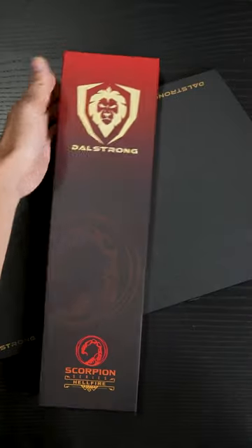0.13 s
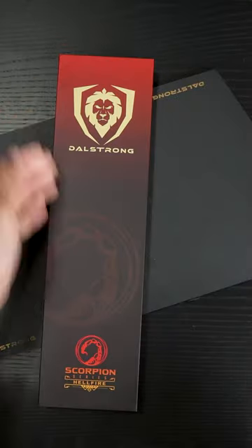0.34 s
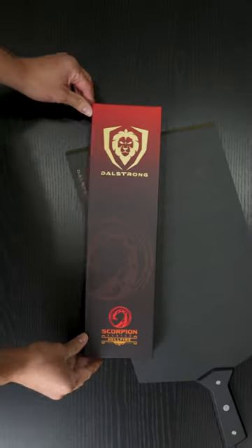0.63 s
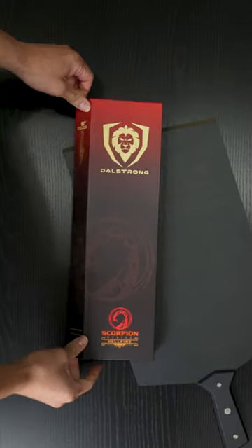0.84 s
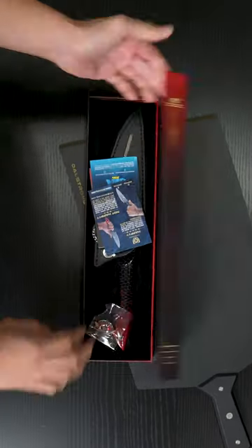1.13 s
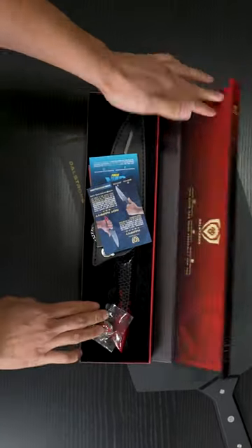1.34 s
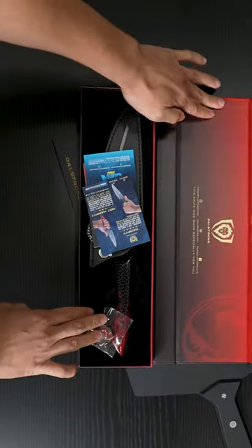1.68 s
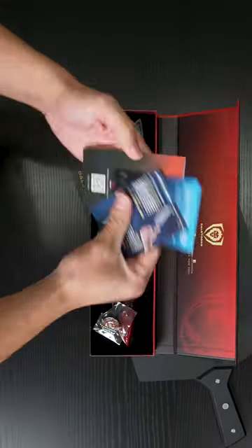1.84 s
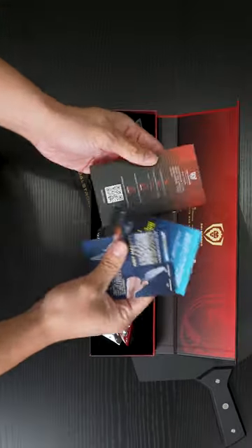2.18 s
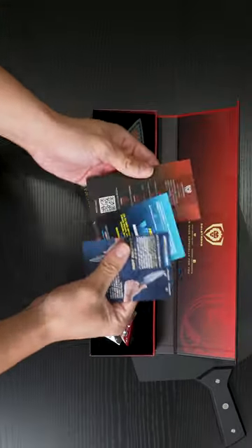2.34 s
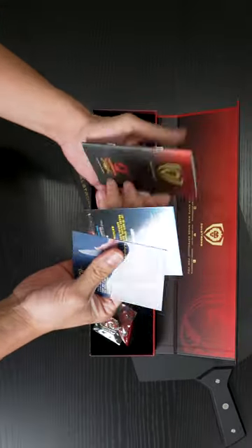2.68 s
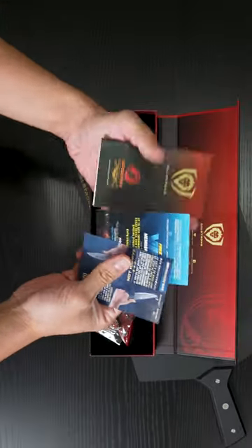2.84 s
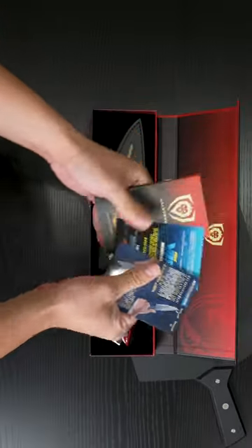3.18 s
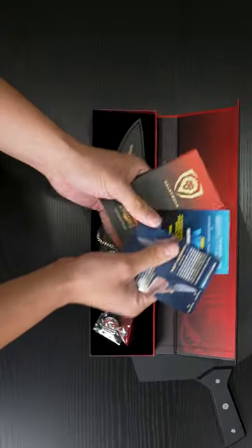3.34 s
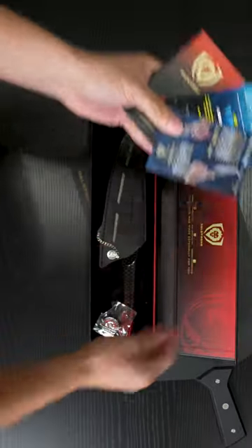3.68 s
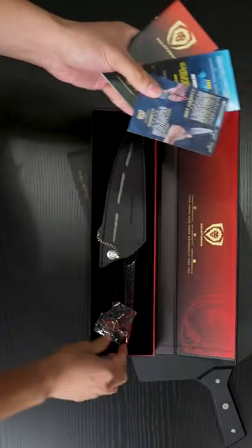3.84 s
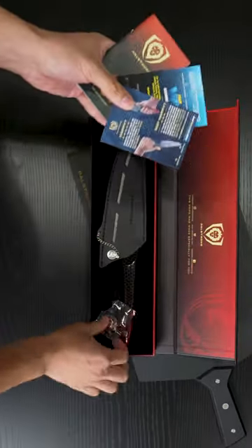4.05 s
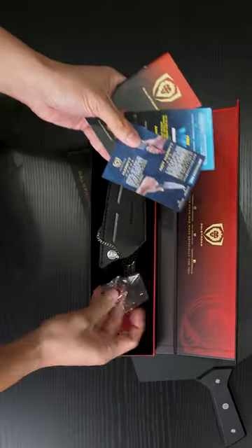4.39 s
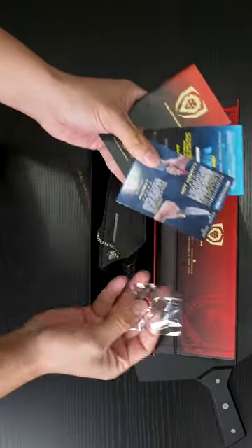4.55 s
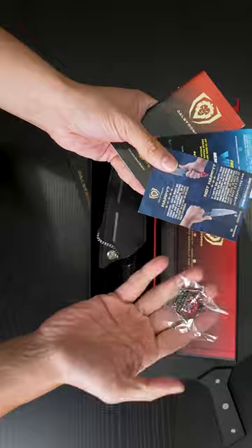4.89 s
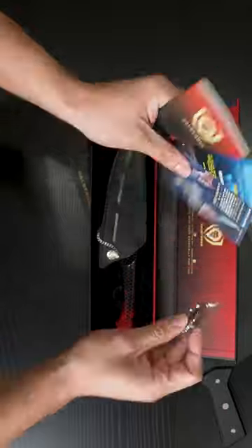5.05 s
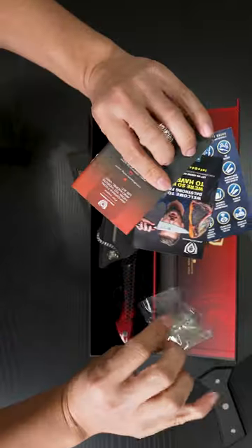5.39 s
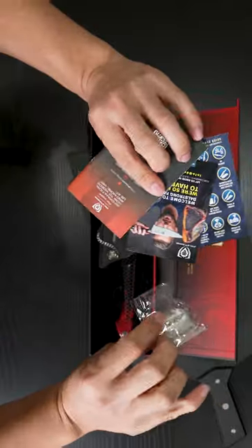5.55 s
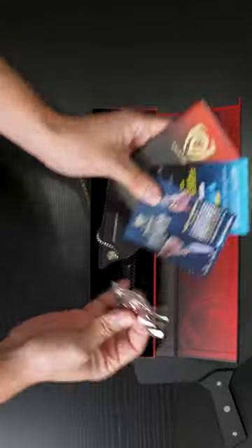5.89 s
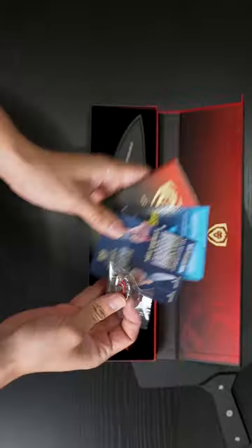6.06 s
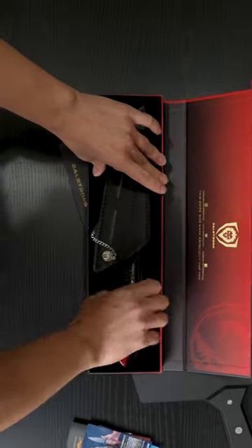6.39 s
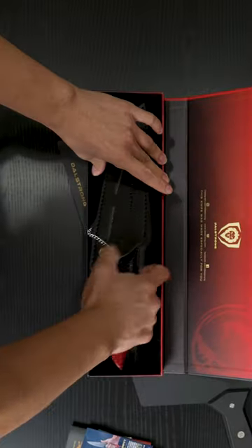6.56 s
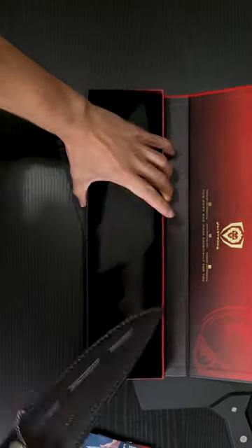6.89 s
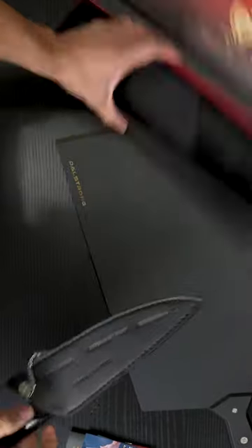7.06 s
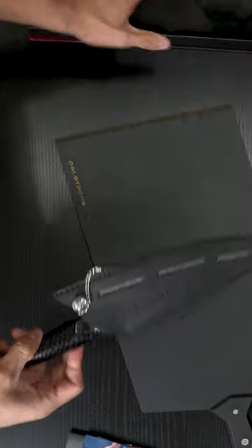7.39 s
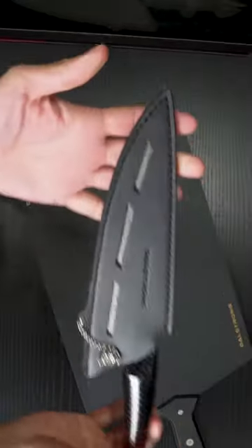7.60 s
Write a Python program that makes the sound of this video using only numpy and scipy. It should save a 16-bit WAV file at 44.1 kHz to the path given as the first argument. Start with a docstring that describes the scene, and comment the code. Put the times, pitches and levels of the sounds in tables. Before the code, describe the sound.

Loud hollow box bumps with low thuds, a crisp opening snap, sliding cards, crackling plastic bag, and a final hard click in a small room.

```python
"""A stiff cardboard gift box is knocked and set down on a desk under a phone in a small room, its stand swaying
after each bump; then it is opened. Cards slide in the hands, a small plastic bag crinkles and a sheath clicks.
Blows ring a resonant box, box tails and friction are shaped noise and snaps are short coloured bursts.
Throughout, noise suppression leaves near silence with flickering low tones between the sounds."""
import sys
import numpy as np
from scipy import signal
from scipy.fft import rfft, irfft, next_fast_len
from scipy.io import wavfile
from scipy.ndimage import uniform_filter1d

SR = 44100
rng = np.random.default_rng(int(sys.argv[2]) if len(sys.argv) > 2 else 0)


def generate_wav(signal):
    """Clip the signal to [-1, 1] and save it as 16-bit WAV at the path in sys.argv[1]."""
    frames = np.transpose(np.atleast_2d(signal))
    scaled = np.clip(frames, -1, 1) * 32767
    pcm = np.round(scaled).astype(np.int16)
    wavfile.write(sys.argv[1], SR, pcm)


N = 340893

# moments at which noisy swells, sway and room tails stop short and the suppressor's memory restarts: time [s]
CUTS_S = [.585, 1.92, 6.26, 6.965, 7.593]


def amp(db):
    """Amplitude of a level in dB."""
    return 10 ** (np.asarray(db) / 20)


def unit(x):
    """x scaled to an rms of 1."""
    return x / np.sqrt(np.mean(x ** 2) + 1e-20)


def along(points, hz):
    """Values at hz between (frequency [Hz], value) points on a log frequency axis."""
    f, v = np.transpose(points)
    return np.interp(np.log(hz + 1), np.log(f + 1), v)


def filtered(x, response):
    """x times a complex response of frequency."""
    m = next_fast_len(N + SR // 2)
    return irfft(rfft(x, m) * response(np.fft.rfftfreq(m, 1 / SR)), m)[..., :N]


def place(times, sounds):
    """Each column of sounds starts at its time."""
    out = np.zeros(N + SR)
    for s, sound in zip(times, sounds.T):
        out[round(s * SR):][:len(sound)] += sound
    return out[:N]


def patchy(size, depth_db, wide, long):
    """Noise whose level varies at random in patches of frequency and time."""
    z = signal.stft(rng.standard_normal(N + SR), nperseg=size)[2]
    field = uniform_filter1d(rng.standard_normal(z.shape), size=wide, axis=0)
    field = uniform_filter1d(field, size=long, axis=1)
    return signal.istft(z * amp(depth_db * unit(field)), nperseg=size)[1][:N]


def swells(t, s, db, rise, fall, bend):
    """Power of each swell (rows) over t: steady dB rise to its peak, fall that may bend, silence past a cut."""
    span_db = 40  # covered in one rise or fall time
    late = t - s[:, None]
    rising = -late / np.abs(rise)[:, None]
    falling = np.abs(late / fall[:, None]) ** bend
    slope = np.where(late < 0, rising, falling)
    same_moment = np.digitize(s, CUTS_S)[:, None] == np.digitize(t, CUTS_S)
    return amp(db[:, None] - span_db * slope) ** 2 * same_moment


def peaked(hz, peak_hz, below_db, above_db):
    """Gains over hz (first axis) falling from a peak; thin sheets radiate no bass; mean power 1."""
    round_octaves = 0.072  # roundness of the peak
    octaves = np.log2((hz[:, None] + 1) / peak_hz)
    below = below_db * np.logaddexp(0, -octaves / round_octaves)
    above = above_db * np.logaddexp(0, octaves / round_octaves)
    gain = amp(-round_octaves * (below + above))
    gain = gain / (1 + (450 / (hz[:, None] + 1)) ** 4)  # bass loss
    return gain / np.sqrt(np.mean(gain ** 2, axis=0))


def bursts(gains, t60):
    """One noise burst a column, a fast decay plus a slow one; the gain is its rms over 3 ms."""
    t = np.arange(1024)[:, None] / SR
    shape = amp(-60 * t / t60) + 1.4 * amp(-60 * t / (9.7 * t60))
    burst = shape * rng.standard_normal((len(gains), len(t))).T
    return gains * burst / np.linalg.norm(burst, axis=0) * np.sqrt(.003 * SR)


def rumble():
    """Faint room rumble: noise patchy in time and frequency, weighted to the lows."""
    # rumble spectrum: (frequency [Hz], relative level [dB])
    spectrum = [(20, -18), (100, -8.5), (230, -10), (450, -19.5), (800, -26.5), (1400, -27.5),
                (2600, -34.5), (3500, -88.5)]
    noise = patchy(size=2048, depth_db=10.5, wide=4, long=3)
    return amp(-66.5) * unit(filtered(noise, lambda hz: amp(along(spectrum, hz))))


def stand():
    """The stand carries each bump to the microphone as a slow sway, its pace the power-weighted mean."""
    # bumps that reach the stand: (time of peak [s], level [dB], frequency [Hz], rise [s], fall [s])
    bumps = [(.09, -20, 39, 0.19, .3), (.225, -10, 35.3, 0.09, 0.23), (.41, -24.5, 34, 0.92, 0.11),
             (0.528, -38, 34.7, 0.043, 0.31), (.61, -39.5, 35.5, 0.25, .12), (0.851, -25, 36.2, .13, 0.14),
             (7.3, -36, 64.4, 0.11, 0.07)]
    s, db, hz, rise, fall = np.transpose(bumps)
    power = swells(np.arange(N) / SR, s, db, rise, fall, bend=1) + 1e-30
    pace_hz = hz @ power / power.sum(axis=0)
    return np.sqrt(2 * power.sum(axis=0)) * np.sin(2 * np.pi * np.cumsum(pace_hz) / SR)


def rustle():
    """Noisy box tails and friction; uneven creases pop in the crinkling, more often when the grip is harder."""
    # noisy swells: box tails after knocks, sliding cards, dull flicks and scuffs of box or card near 2 kHz,
    # broad bright rubs, mostly of film: (time of peak [s], relative level [dB], strongest [Hz], rise [s], fall [s])
    box_tails = [(.035, -15.5, 463, 0.023, 0.044), (.11, -16.5, 510, 0.027, 0.021),
                 (.18, -11.5, 574, 0.066, 0.25), (.24, -21.5, 1300, 0.33, 0.33),
                 (.77, -39.5, 603, 0.027, 0.11), (.998, -54.5, 500, 0.026, 0.13),
                 (1.285, -50.5, 1110, 0.044, .12), (1.626, -38.5, 980, 0.018, 0.082),
                 (1.715, -38, 1250, 0.17, 0.14), (4.25, -43.5, 600, 0.02, 0.07),
                 (4.555, -50, 600, 0.017, 0.084), (6.24, -43.5, 800, 0.049, 0.13),
                 (7.265, -26.5, 750, 0.019, 0.077)]
    card_slides = [(1.6, -47.5, 11400, 0.17, 0.3), (1.93, -57.5, 11620, 0.066, .4),
                   (2.03, -44.5, 8800, 0.35, .24), (2.18, -57, 9000, 0.23, 0.17),
                   (2.41, -52.5, 12210, 0.15, 0.33), (2.99, -50, 10440, 0.031, .3),
                   (3.08, -37, 11840, 0.14, 0.15), (3.203, -28.5, 4940, 0.13, 0.16),
                   (6.58, -68, 8900, 0.13, 0.12)]
    dull_flicks = [(.59, -57, 1600, 0.012, 0.27), (.772, -41.5, 2000, .025, 0.092),
                   (.995, -49, 2240, 0.026, .12), (2.06, -49, 2100, 0.17, 0.18),
                   (2.25, -64.5, 2302, 0.12, .15), (2.664, -40.5, 2048, .04, 0.11),
                   (3.03, -56, 2350, 0.11, 0.12), (3.12, -52.5, 1990, 0.061, 0.13),
                   (5.39, -56, 1500, 0.054, .2), (5.43, -48, 1520, 0.14, 0.14),
                   (5.54, -55.5, 1450, 0.053, 0.14), (5.66, -51.5, 1740, 0.11, .15),
                   (5.86, -64, 1360, .08, 0.16), (6.985, -36, 1820, 0.038, 0.11),
                   (7.268, -25.5, 1900, 0.023, 0.13), (7.36, -43, 1967, .2, 0.14)]
    bright_rubs = [(.795, -57, 5000, 0.047, 0.098), (1.367, -42, 4820, 0.11, 0.21),
                   (1.442, -42.5, 4730, 0.22, 0.3), (1.33, -45.5, 1600, .06, 0.24),
                   (1.69, -45.5, 5500, .25, 0.12), (2.05, -43.5, 4050, 0.094, 0.17),
                   (2.88, -67, 3490, .05, 0.09), (3.43, -63, 6690, 0.3, .07),
                   (4.011, -49.5, 1906, 0.026, 0.6), (4.106, -40, 3400, 0.16, 0.79),
                   (4.19, -40, 3500, 0.22, 0.195), (4.24, -29.5, 2270, 0.15, 0.22),
                   (4.41, -34, 7000, .15, 0.35), (4.54, -37.5, 2070, .16, 0.36),
                   (4.714, -39, 4547, .5, 0.33), (5.103, -41.5, 4850, 0.014, 0.2),
                   (5.208, -46.5, 5200, 0.093, 0.27), (5.542, -50.5, 9200, 0.075, 0.15),
                   (5.667, -53, 5220, 0.3, 0.35), (5.78, -49, 5030, .3, 0.47),
                   (5.922, -38.5, 1780, 0.039, 0.22), (6.026, -40, 3480, 0.27, 0.38),
                   (6.18, -39, 5500, 0.28, .4), (6.256, -33, 5170, .15, .3), (6.29, -56.5, 5000, .15, 0.26),
                   (6.38, -34.5, 3000, .08, .13), (6.44, -41.5, 3200, 0.065, 0.084),
                   (6.775, -43, 5670, 0.064, .13), (6.8, -59, 7150, .1, 0.22),
                   (6.884, -52, 7000, 0.037, 0.14), (7.135, -58, 3500, 0.0222, .06),
                   (7.415, -45, 5240, 0.028, 0.045)]
    # film and bag being creased: (start [s], end [s])
    crinkling_s = [(1.3, 1.75), (4.03, 4.8), (5.08, 6.45)]
    # colours: (swells, fall below peak [dB/octave], fall above a 4 kHz peak [dB/octave],
    # exponent steepening the latter with peak frequency, bend of the fall in time: above 1 slow first, then faster)
    colours = [(box_tails, 5.7, 16, 0.0088, 1.2), (card_slides, 17.3, 2.6, 2.7, 1.42),
               (dull_flicks, 35, 12.95, .01, 1.075), (bright_rubs, 9, 11, 0.82, 1.05)]
    coloured = [(*row, *colour) for rows, *colour in colours for row in rows]
    s, db, peak_hz, rise, fall, below_db, above_db, steepens, bend = np.transpose(coloured)
    above_db = above_db * (peak_hz / 4000) ** steepens
    frames = np.arange(0, N + 256, 128) / SR
    power = swells(frames, s, db, rise, fall, bend[:, None])

    t = np.arange(N) / SR
    grip_db = np.interp(t, frames, 10 * np.log10(power.sum(axis=0) + 1e-30))
    creasing = sum((t > a) & (t < b) for a, b in crinkling_s)
    pops_per_s = 260 * np.clip((grip_db + 57) / 20, 0, 1) * creasing
    pops = (rng.random(N) < pops_per_s / SR) * amp(1.8 * rng.exponential(size=N))
    crease = amp(-60 * np.arange(SR // 100) / SR / .006)  # t60 6 ms
    envelope = 1 + signal.fftconvolve(pops, crease)[:N]
    hiss = envelope * patchy(size=256, depth_db=4, wide=5, long=20)

    hz, _, z = signal.stft(hiss, SR, nperseg=256)
    gain = np.sqrt(peaked(hz, peak_hz, below_db, above_db) ** 2 @ power[:, :z.shape[1]])
    return amp(-4.0) * signal.istft(z * gain, SR, nperseg=256)[1][:N]


def knocks():
    """Each blow is one short push that rings the hollow box, and a crack on its surface."""
    # knocks on box and desk: (time [s], relative level [dB], crack relative to box tone [dB])
    blows = [(0.029, -21, -12), (.102, -7, -30), (.162, -5.5, -5.5), (.177, -10.5, -26), (.188, -5.5, -5.5),
             (.194, -24.5, 4), (.215, -14.5, -8.5), (.763, -37, -21.5), (0.796, -50.5, 6.5),
             (1.279, -53.5, -18), (1.621, -51.5, 1), (1.708, -63, -12), (4.248, -61, -14),
             (4.551, -66, -22.5), (6.238, -54, -6), (7.256, -36, -30), (7.269, -58, -8)]
    # hollow box resonances: (frequency [Hz], width [Hz], relative level [dB])
    resonances = [(110, 63, -9), (320, 120, -7.5), (490, 320, -1.5), (650.2, 250, 5), (806, 250, -3.5),
                  (1130, 200, -1.5), (2180, 690, -15.5)]
    s, db, crack_db = np.transpose(blows)

    def hollow(f):
        """Sum of the box resonances, alternating in sign."""
        return sum((-1) ** k * amp(g) * 1j * f * w / (c * c - f * f + 1j * f * w)
                   for k, (c, w, g) in enumerate(resonances))

    def surface(f):
        """Broad 3.5 kHz resonance, then three 6.2 kHz low-pass poles."""
        resonance = 1j * f * 4000 / (3500 ** 2 - f * f + 1j * f * 4000)
        return resonance / (1 + (1j * f / 6200)) ** 3

    push = signal.get_window("hann", Nx=14)[:, None] * amp(db + 21)
    rough = bursts(amp(db + 9.5), t60=0.0027)
    tone = filtered(place(s, push) + place(s, rough), hollow)
    crack = place(s, bursts(amp(db + crack_db + 10), t60=0.001))
    return tone + filtered(crack, surface)


def room(x):
    """Each frequency of the room's answer dies at its own speed; each stretch of time gets its own tail."""
    # room decay: (frequency [Hz], t60 [s])
    decay = [(200, 0.22), (700, .25), (2000, 0.31), (8000, 0.37), (16000, 0.089)]
    cuts = np.r_[np.round(np.multiply(CUTS_S, SR)).astype(int), 2 * N]
    out = np.zeros(N + SR)
    edges = np.unique(np.r_[np.arange(0, N, SR // 4), cuts[:-1], N])
    for a, b in zip(edges[:-1], edges[1:]):
        hz, t, z = signal.stft(rng.standard_normal(SR // 2), SR, nperseg=256)
        tail = signal.istft(z * amp(-60 * t / along(decay, hz)[:, None]), SR, nperseg=256)[1]
        delayed = np.pad(x[a:b], (150, 0))  # samples
        wet = signal.fftconvolve(delayed, tail / np.linalg.norm(tail))
        wet = wet[:cuts[cuts >= b][0] - a]  # tail ends at the next cut
        out[a:][:len(wet)] += wet
    return out[:N]


def flickers():
    """Short soft low tones, each a sine under a Gaussian envelope."""
    # low tones: (time of peak [s], frequency [Hz], level [dB], length [s])
    low_tones = [(0.793, 284, -34.5, 0.027), (0.797, 180.6, -34, 0.072), (1.016, 459, -54.5, 0.036),
                 (1.109, 139, -42, 0.053), (1.738, 91.2, -48.5, 0.037), (1.822, 175, -55.5, 0.077),
                 (1.844, 66.5, -51.5, 0.09), (2.607, 68.4, -53, .098), (3.038, 60, -46.5, 0.029),
                 (3.096, 216.6, -44, .16), (3.217, 44.9, -48.5, 0.088), (3.606, 110, -42, 0.046),
                 (3.997, 380, -53.5, 0.034), (4.058, 50.9, -52.5, 0.052), (4.307, 175, -52.5, .14),
                 (4.832, 129.9, -46.5, .052), (4.935, 67.4, -49.5, 0.11), (5.182, 450, -54, 0.032),
                 (5.214, 110, -39.5, 0.058), (5.489, 217.5, -44.5, 0.14), (5.762, 220, -51.5, 0.053),
                 (5.827, 131.7, -53, 0.13), (6.463, 219, -39, .1), (6.494, 41.6, -49.5, .11),
                 (6.538, 178.4, -46, 0.1), (7.078, 460, -57.5, .0765), (7.444, 353, -51.5, .036),
                 (7.717, 134.6, -54.5, .031)]
    s, hz, db, length = np.transpose(low_tones)
    t = np.arange(-SR // 4, SR // 4)[:, None] / SR
    envelope = amp(db) * np.exp(-8 * (t / length) ** 2)
    return place(s + t[0], envelope * np.sin(2 * np.pi * hz * t))


def snaps():
    """A fold lets go: a short burst in the colour of that fold, with nothing before the onset."""
    # snaps of plastic and card: (time [s], level [dB], strongest [Hz], fall above it [dB/octave])
    folds = [(1.2803, -40.5, 1200, 18), (1.3194, -44.5, 8520, 35.5), (1.3297, -31.5, 1570, 9),
             (1.3422, -41, 8720, 20), (1.3482, -33, 1374, 7), (1.3568, -22.5, 1480, 4.5),
             (1.3687, -12, 3790, 7), (1.425, -25, 2080, 6.5), (1.4817, -40, 4100, -5),
             (1.5769, -26, 13300, -1), (1.6458, -33.5, 9200, -0.5), (1.677, -28.5, 15610, -7),
             (1.7076, -28, 3065, 18.5), (2.6545, -29.5, 2224, 39.5), (3.1648, -31, 6360, 8.5),
             (4.0384, -37, 2340, 8.5), (4.0432, -31, 1703, 11), (4.0779, -25.5, 1382, 9),
             (4.0916, -12.5, 2070, 6), (4.112, -19, 990, 1.5), (4.1166, -25, 1207, -3.5),
             (4.1203, -22, 1300, 6.5), (4.1382, -18.5, 8690, 17), (4.176, -30.5, 1930, 13),
             (4.1861, -23.5, 1785, 5), (4.2043, -23.5, 2300, 5.5), (4.2169, -26, 1175, 10),
             (4.23, -16, 1650, 2.5), (4.249, -38, 2120, 4), (4.2608, -21, 7900, 15.5),
             (4.2784, -25, 7650, 38), (4.3429, -32.5, 1400, 3.5), (4.3915, -26, 4870, 5),
             (4.3997, -17, 8340, 24.5), (4.4037, -14, 7440, 14), (4.5207, -16, 2300, 3),
             (4.5284, -21.5, 8370, 15), (4.5411, -29, 4840, 15), (4.5496, -18, 5750, 4.5),
             (4.5767, -20, 3210, 7), (4.622, -12, 1810, 2.5), (4.6965, -16.5, 3210, -1.7),
             (4.7005, -38.5, 3480, 10.5), (4.722, -23.5, 4070, 14), (4.7453, -41, 3770, 9.5),
             (4.7619, -37.5, 3760, 6), (5.0928, -31, 5150, 10.5), (5.1576, -37.5, 5440, 16),
             (5.1976, -26, 4530, 3), (5.3698, -46, 5750, 29.5), (5.408, -27.5, 5300, 10),
             (5.426, -36.5, 5450, 16.5), (5.5292, -20.5, 7600, 1), (5.535, -42.5, 3200, -4),
             (5.6528, -18, 3830, 4.5), (5.6783, -37.5, 1800, 2), (5.778, -39, 7560, 42),
             (5.9005, -30.5, 2260, 4.5), (5.9136, -25, 1960, -2), (5.9223, -26, 1530, 2),
             (5.9302, -25, 2300, 8), (5.953, -28.5, 10900, 23), (5.9975, -33.5, 4480, 12),
             (6.0076, -18, 2184, 3), (6.021, -36.5, 1930, 12.5), (6.0357, -20.5, 3920, 10),
             (6.129, -20.5, 2130, -0.5), (6.145, -27, 3930, 14), (6.1631, -32.5, 4480, 22.5),
             (6.1687, -21.5, 3820, 0), (6.2001, -34.5, 4130, 14), (6.2057, -22, 1810, -0.5),
             (6.2151, -19.5, 4870, 11.5), (6.2309, -25.5, 2460, 4), (6.2377, -11.5, 1960, 1.5),
             (6.2508, -16, 4880, 12), (6.3669, -27.5, 2843, 15), (6.3791, -23.5, 10180, 47),
             (6.3996, -37, 3000, 14), (6.437, -32.5, 2920, 6), (6.7697, -30, 7210, 59.5),
             (6.7763, -41, 3410, 41), (6.8646, -37, 3290, 9), (6.9832, -34, 2048, 28.5),
             (7.2578, -10, 1990, 14), (7.2692, -28.5, 2130, 17), (7.4117, -42.5, 2140, 6),
             (7.589, -45, 8700, 15)]
    s, db, hz, above_db = np.transpose(folds)
    # 19.5 dB/octave below a 2 kHz peak, steeper with the fall above, gentler under higher peaks
    below_db = (19.5 + 0.29 * np.maximum(above_db, 0)) * (2000 / hz) ** 0.74
    colour = peaked(np.fft.rfftfreq(1024, 1 / SR), hz, below_db, above_db)
    # minimum phase by folding the cepstrum
    cepstrum = irfft(np.log(colour + 1e-5), axis=0)
    cepstrum[1:512] *= 2
    causal = np.exp(rfft(cepstrum[:513], 1024, axis=0))
    burst = bursts(np.ones(len(s)), t60=0.0017)
    sound = irfft(rfft(burst, axis=0) * causal, axis=0)
    same_energy = np.linalg.norm(burst, axis=0) / np.linalg.norm(sound, axis=0)
    return place(s, amp(db) * sound * same_energy)


def scene():
    """All sources, with the room's answer to knocks and snaps."""
    box, crisp = knocks(), snaps()
    wet = room(amp(-9) * box + amp(-13.0) * crisp)
    return (rumble() + stand() + rustle() + box + wet + flickers() + crisp)[None]


def record(dry):
    """Noise suppression shuts bands near a threshold that rises after loud sound; peaks clip; the band ends."""
    # edges of the suppressor bands: frequency [Hz]
    band_edges_hz = [0, 90, 170, 260, 350, 520, 700, 860, 1030, 1300, 1650, 2100, 2650, 3300, 4200, 5300,
                     6800, 8500, 10700, 13500, 23000]
    # resting threshold: (frequency [Hz], level [dB])
    resting = [(100, -91), (400, -89.5), (1000, -86.5), (2200, -87.5), (4000, -90.5), (16000, -104)]
    memory = 0.005  # share of each new frame in the running level
    after_loud_db = -27  # threshold added, relative to the running level
    top_hz = 16900
    hz, t, z = signal.stft(dry[0], SR, nperseg=1024, noverlap=768)
    member = np.digitize(hz, band_edges_hz)
    same = member[:, None] == member
    band_mean = same / same.sum(axis=1, keepdims=True)
    power = uniform_filter1d(band_mean @ np.abs(z) ** 2, size=5, axis=1)
    moments = np.split(power, np.searchsorted(t, CUTS_S) + 1, axis=1)
    recent = np.hstack([signal.lfilter([memory], [1, memory - 1], part, axis=1) for part in moments])
    threshold = amp(along(resting, hz))[:, None] ** 2 + amp(after_loud_db) ** 2 * recent
    gain = power ** 1.5 / (power ** 1.5 + threshold ** 1.5)
    kept = signal.istft(z * gain, SR, nperseg=1024, noverlap=768)[1][:N]
    hiss = amp(-96) * rng.standard_normal(N)  # the converter's own noise
    clipped = np.clip(kept, -.92, .92)
    return filtered(clipped + hiss, lambda f: np.clip((top_hz - f) / 1300, 0, 1) ** 2)[None]


dry = scene()
out = record(dry)
generate_wav(out)
```